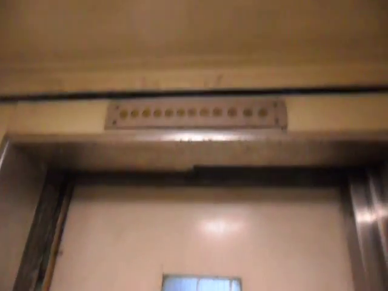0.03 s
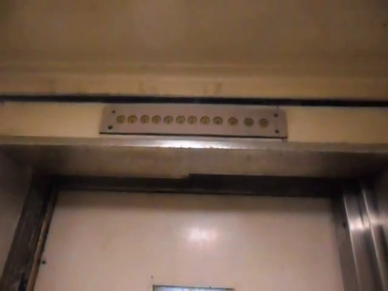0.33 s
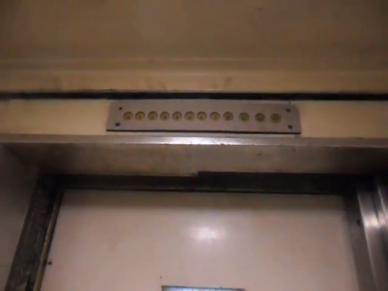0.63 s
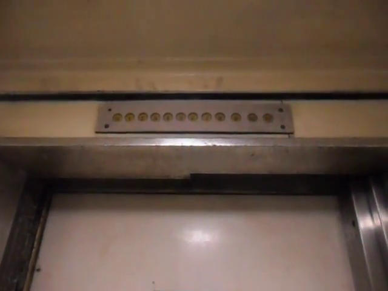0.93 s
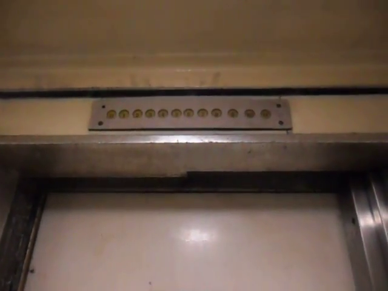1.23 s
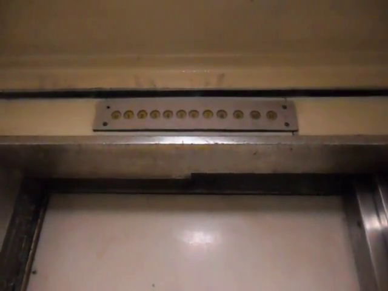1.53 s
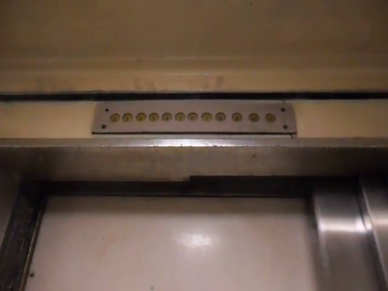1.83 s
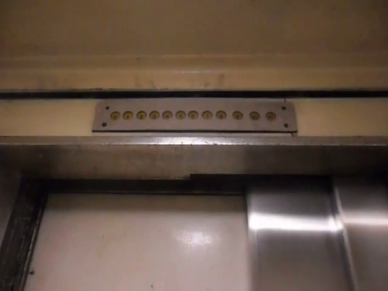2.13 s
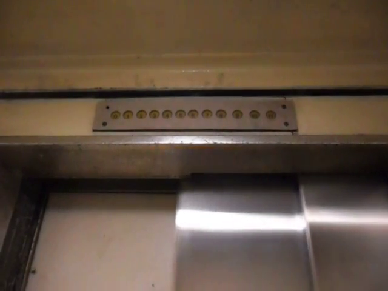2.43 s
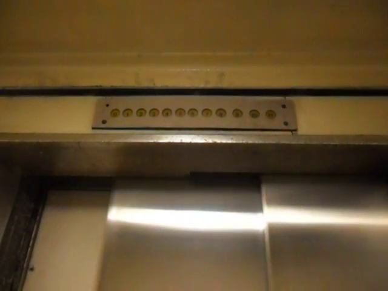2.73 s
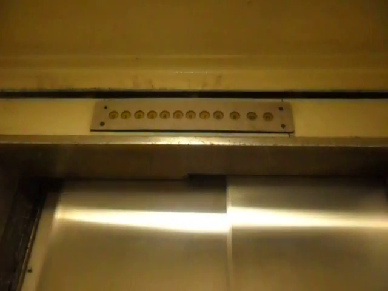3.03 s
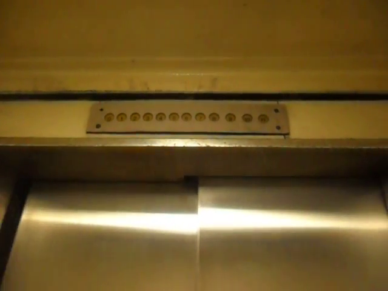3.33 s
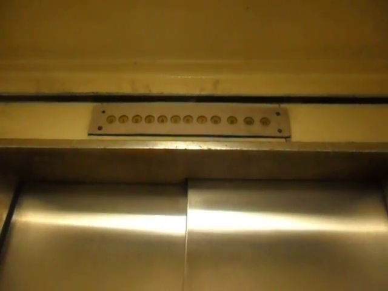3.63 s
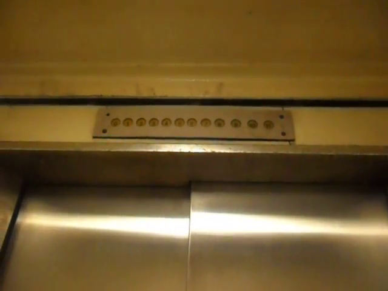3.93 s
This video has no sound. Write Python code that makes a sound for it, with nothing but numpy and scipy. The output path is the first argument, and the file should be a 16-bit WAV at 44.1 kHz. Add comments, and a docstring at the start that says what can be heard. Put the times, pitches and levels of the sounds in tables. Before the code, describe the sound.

Elevator doors roll shut with a grinding rattle and a clack over a steady fan hum.

```python
"""Inside an old lift car, small and hard-walled, a fan motor hums over a rush of air.
Two steel door panels roll shut: their rollers grind over grit, squeak and knock on joints in
the track. Loose hangers (the brackets that carry the doors) rattle, the steel sheets drone and
the car rumbles. The doors slow down and meet the frame, and the lock creaks and clacks home."""
import sys
import numpy as np
from scipy import signal
from scipy.fft import rfft, irfft
from scipy.io import wavfile

SR = 44100
rng = np.random.default_rng(int(sys.argv[2]) if len(sys.argv) > 2 else 0)


def transcribe(signal):
    """Save signal, clipped to [-1, 1], as a 16-bit WAV file at the path in sys.argv[1]."""
    frames = np.atleast_2d(signal).T
    limited = np.clip(frames, -1, 1)
    pcm = np.round(limited * 32767).astype(np.int16)
    wavfile.write(sys.argv[1], SR, pcm)


N = 176400
RING_CYCLES = 24  # struck steel fades by 60 dB in this many vibrations


def from_db(db):
    """Turn decibels into a number to multiply a sound by."""
    return 10 ** (np.asarray(db) / 20)


def rms_one(x):
    """Scale a signal so that its average strength (rms) is 1."""
    return x / np.sqrt(np.mean(x ** 2) + 1e-20)


def seconds():
    """The time of every sample."""
    return np.arange(N) / SR


def level(rows):
    """A volume curve through (time_s, level_db) points, silent before the first."""
    return from_db(np.interp(seconds(), *np.transpose(rows), left=-120))


def at_hz(points, hz):
    """Look up a (pitch_hz, value) table, with all octaves equally wide."""
    pitches, values = np.transpose(points)
    return np.interp(np.log(np.maximum(hz, 1)), np.log(pitches), values)


def drift(rate_hz):
    """A smooth random wobble of about size 1; a higher rate wobbles faster."""
    step, warm_up = 40, 2000
    r = np.exp(-2 * np.pi * rate_hz * step / SR)
    noise = rng.standard_normal(N // step + warm_up + 2)
    slow = signal.lfilter([1], [1, -2 * r, r * r], noise)[warm_up:]
    return np.interp(np.arange(N) / step, np.arange(len(slow)), rms_one(slow))


def colour(x, spectrum):
    """Make some pitches stronger and others weaker; white noise keeps its overall power."""
    size = 2 * N
    gain = rms_one(from_db(at_hz(spectrum, np.arange(N + 1) * SR / size)))
    cepstrum = irfft(np.log(gain))
    cepstrum[1:N] *= 2  # folded so that the filter rings after a hit, never before
    cepstrum[N + 1:] = 0
    return irfft(rfft(x, size) * np.exp(rfft(cepstrum)))[:N]


def ring(x, hz, fade_s):
    """Let a signal ring at one pitch, which dies away by 60 dB in fade_s."""
    r = np.exp(-np.log(1000) / (fade_s * SR))
    angle = 2 * np.pi * hz / SR
    return signal.lfilter([1, 0, -1], [1, -2 * r * np.cos(angle), r * r], x + 1e-18) * np.sqrt((1 - r) / 2)


def chatter(start_s, length_s):
    """A loose part bounces: a quick run of uneven taps that tend to get weaker."""
    taps_per_s, spread_db, loss_db = 500, 8, 7
    count = int(length_s * taps_per_s) + 1
    slip, size, sign = rng.random((count, 3)).T
    slip[0] = 0  # the first tap is on time
    progress = (np.arange(count) + slip) / count
    taps = from_db(spread_db * size - loss_db * progress) * np.sign(sign - .5)
    samples = ((start_s + length_s * progress) * SR).astype(int)
    out = np.zeros(N)
    out[np.minimum(samples, N - 1)] = rms_one(taps) * np.sqrt(length_s * SR / count)
    return out


def wavering_tone(hz, waver_hz, rough, pitch_rate_hz=164.6, volume_rate_hz=200):
    """A tone with wobbling pitch and volume; fast wobbles sound like metal sticking and slipping."""
    phase = 2 * np.pi * np.cumsum(hz + waver_hz * drift(pitch_rate_hz)) / SR
    return np.sin(phase) * (1 + rough * drift(volume_rate_hz))


def fan():
    """The fan motor hums almost steadily, with rushing air and a faint, thin whistle."""
    # tones of the motor: pitch_hz, level_db
    hum_tones = [(86.1, -40), (172.3, -55.5), (258.4, -56), (344.5, -53.5), (387.6, -56.5), (495.3, -64.5),
                 (538.3, -65)]
    # tone colour of the moving air: pitch_hz, relative_db
    air_colour = [(15, -15), (23, -6.5), (33, 3.5), (45, -11.5), (64, -11.5), (82, -2.5), (98, -1.5),
                  (112, -11.5), (140, -28.5), (175, -15.5), (215, -30.5), (280, -18.5), (400, -21),
                  (600, -25), (1000, -30), (2000, -35), (4000, -40), (10500, -45.5)]
    air = from_db(-38.5) * colour(rng.standard_normal(N), air_colour)
    whistle = from_db(-69) * ring(rng.standard_normal(N), hz=7100, fade_s=0.031)
    out = air + whistle
    for hz, db in hum_tones:
        tone = wavering_tone(hz, waver_hz=1.14, rough=0.32, pitch_rate_hz=4.55, volume_rate_hz=4)
        out += from_db(db) * np.sqrt(2) * tone
    return out


def rattles():
    """A faint rattle sounds first at 1.49 s; then the loose hangers chatter in bursts, some bright and some
    dull."""
    # bursts of rattling: start_s, level_db, length_s, treble_db
    bursts = [(1.489, -57.5, 0.14, 8), (1.723, -33.5, .03, -3.5), (1.751, -31, .04, -11),
              (1.841, -29.5, 0.039, -20), (1.946, -31.5, 0.027, 2), (1.979, -26.5, 0.033, 0.5),
              (2.093, -27.5, .04, -16), (2.171, -30, .03, 0), (2.213, -31, 0.073, -9),
              (2.338, -36.5, 0.033, 10), (2.412, -31.5, 0.038, -26), (2.471, -27.5, 0.047, -3),
              (2.536, -27.5, 0.017, -4), (2.564, -34.5, .06, 4), (2.664, -41, 0.04, 14),
              (2.73, -27.5, 0.053, 2.5), (2.787, -32.5, .06, 2), (2.879, -42, 0.028, 16.5),
              (2.966, -30.5, .04, -3), (3.043, -39, 0.026, 13.5), (3.107, -45.5, 0.016, 14),
              (3.212, -38.5, 0.032, 2), (3.278, -43, .025, 8), (3.324, -41, .008, -3),
              (3.365, -42.5, 0.046, 0)]
    treble_hz = 4670
    high = signal.butter(2, treble_hz, "high", fs=SR, output="sos")
    low = signal.butter(2, treble_hz, fs=SR, output="sos")
    out = np.zeros(N)
    for start_s, db, length_s, treble_db in bursts:
        taps = from_db(db - 0.25) * chatter(start_s, length_s) + 1e-18
        out += signal.sosfilt(low, taps) - from_db(treble_db) * signal.sosfilt(high, taps)
    return steel(out)


def steel(taps):
    """Make bare taps sound like steel hitting steel."""
    # tone colour of the steel: pitch_hz, relative_db
    steel_colour = [(150, -24), (300, 4.5), (700, 3), (1100, 5.5), (2000, 0.5), (3300, -1), (4300, -11.5),
                    (5600, -14.5), (7500, -15), (10500, -21)]
    return colour(taps, steel_colour)


def rumble():
    """The car shakes under the moving doors with a deep noise."""
    # strength of the shaking: time_s, level_db
    shaking = [(1.5, -61), (1.68, -40.5), (1.95, -34), (2.0, -22.5), (2.18, -31.5), (2.28, -24.5),
               (2.35, -39), (2.43, -25), (2.64, -28.5), (2.83, -23), (2.89, -33), (3.22, -30), (3.33, -34),
               (3.44, -35.5), (3.5, -32.5), (3.6, -34.5), (4.0, -39.5)]
    # tone colour of the car: pitch_hz, relative_db
    car_colour = [(15, -14), (26, -3.5), (36, 3), (47, -10), (58, -5.5), (72, -1), (92, 3.5), (115, -13.5),
                  (160, -17), (220, -26), (500, -54.5)]
    return level(shaking) * colour(rng.standard_normal(N), car_colour)


def rollers():
    """Grit and pits in the track send tiny ticks through the wheels into one door."""
    # strength of the rolling as the doors speed up and slow down: time_s, level_db
    rolling = [(1.6, -58), (1.68, -38), (1.76, -34), (1.88, -27), (1.95, -35.5), (2.06, -25), (2.15, -32),
               (2.26, -25.5), (2.53, -27), (2.68, -29.5), (2.8, -22.5), (2.92, -30), (3.05, -26.5),
               (3.24, -35), (3.46, -41), (3.54, -36.5), (3.69, -33.5), (3.82, -42), (4.0, -53.5)]
    ticks_per_s, spread_db, uneven_db = 900, 3, 1.5
    sizes = from_db(spread_db * np.minimum(rng.exponential(1, N), 4)) * rng.choice([-1, 1], N)
    ticks = rms_one(sizes * (rng.random(N) < ticks_per_s / SR))
    unevenness = from_db(1 + uneven_db * drift(35))
    return ticks * level(rolling) * unevenness / np.sqrt(2)  # each door has half the power


def door(force):
    """A door panel turns the ticks and thuds it is given into a low grinding."""
    # tone colour of a rolling door: pitch_hz, relative_db
    door_colour = [(100, -32), (160, -8), (220, -25.5), (280, -0.5), (340, -8), (420, -4), (560, -6.5),
                   (1000, -9), (1300, -15), (2200, -21), (3200, -23.5), (4100, -33), (6000, -34.5),
                   (10500, -44.5)]
    return colour(force, door_colour)


def sheets(force):
    """The doors' steel sheets ring when shaken; each note swells and bends as they flex."""
    # natural notes of the sheets: pitch_hz, relative_db, fade_s
    notes = [(264, -3.5, 0.34), (292.1, -7, 0.48), (343, -20, 0.15), (401, -2, 0.9), (440, -2, 0.61),
             (498, -1, 1), (624.5, -4.5, 0.26), (686, -8, 0.61), (831.7, -6, 0.1), (965, -9, 0.085),
             (1087, -10, 0.32), (1310, -15, 0.26), (1614, -8.5, 0.16), (1878, -12, 0.36), (2606, -30, 0.35)]
    swell_db, bend_cycles = 2.5, 0.29
    out, t = np.zeros(N), seconds()
    for hz, db, fade_s in notes:
        note = ring(force * from_db(db + swell_db * drift(10)), hz, fade_s)
        bent_time = t + bend_cycles * drift(3.32) / hz
        out += np.interp(bent_time, t, note)
    return from_db(-2.5) * out / 2


def judders():
    """A juddering roller drives a steel sheet into a brief, rough drone."""
    # swells of the drone: peak_s, level_db, pitch_hz, rise_s, fall_s
    drones = [(1.635, -36.5, 391.5, 0.017, 0.015), (1.895, -25, 300, 0.012, 0.016),
              (2.07, -22, 296.7, .02, 0.016), (2.151, -24, 445, 0.0083, 0.051),
              (2.245, -22, 436.6, 0.03, .02), (2.288, -13.5, 441.2, 0.014, 0.015),
              (2.346, -16.5, 455, 0.013, 0.013), (2.385, -19.5, 297.8, 0.015, 0.027),
              (2.53, -19, 283.4, 0.03, 0.015), (2.801, -19.5, 393.8, 0.047, 0.031),
              (2.935, -25.5, 287.6, 0.012, .02), (3.069, -9.5, 465, 0.011, 0.0048),
              (3.112, -13.5, 478.6, 0.011, 0.038), (3.18, -32, 297, 0.042, 0.022),
              (3.244, -28, 296.5, 0.082, 0.11)]
    out = np.zeros(N)
    for peak_s, db, hz, rise_s, fall_s in drones:
        t = seconds() - peak_s
        swell = np.exp(np.minimum(t / rise_s, -t / fall_s))
        tone = wavering_tone(hz, waver_hz=21, rough=0.35, pitch_rate_hz=59.7, volume_rate_hz=92)
        out += from_db(db) * swell * tone
    return out


def clacks():
    """Each catch bounces, rings and thuds into the doors. Gives back the clack and the thud."""
    # the drive engages, then the doors meet the frame and lock:
    # start_s, level_db, pitch_hz, ring_db, thud_db
    catches = [(1.673, -45, 1000, 2, -10), (3.485, -37.5, 4500, 0.5, 7), (3.555, -35, 1054, 9, -7),
               (3.626, -28.5, 3300, -3, 3.5), (3.65, -34.5, 640, -2, -12), (3.687, -32, 4170, -3.5, -2.5),
               (3.784, -53, 1780, 9, 13), (3.833, -49, 4340, 8.5, -5)]
    # tone colour of the lock: pitch_hz, relative_db
    lock_colour = [(150, -21), (350, 10), (700, 0), (1600, 9), (2300, -1.5), (3600, 3.5), (4500, -12.5),
                   (7000, -19), (10500, -46)]
    clack, thud = np.zeros((2, N))
    for start_s, db, hz, ring_db, thud_db in catches:
        taps = from_db(db - 2.5) * chatter(start_s, length_s=0.014)
        clack += colour(taps, lock_colour) + from_db(ring_db) * ring(taps, hz, RING_CYCLES / hz)
        thud += from_db(thud_db) * taps
    return clack, thud


def squeaks():
    """Dry roller bearings stick and slip in short, rough chirps."""
    # chirps of the bearings: start_s, length_s, pitch_hz, level_db
    chirps = [(1.762, 0.069, 3230, -40), (1.835, 0.031, 3170, -32), (1.898, 0.038, 2915, -30.5),
              (1.951, 0.038, 2700, -30), (2.087, 0.034, 3410, -33.5), (2.2, 0.036, 3050, -30),
              (2.403, 0.028, 3176, -34), (2.435, 0.032, 2870, -34), (2.537, 0.026, 2914, -29),
              (2.607, 0.015, 2990, -32), (2.666, 0.029, 3340, -38), (2.952, 0.068, 3000, -33)]
    out = np.zeros(N)
    for start_s, length_s, hz, db in chirps:
        swell = np.sin(np.pi * np.clip((seconds() - start_s) / length_s, 0, 1))
        out += from_db(db) * swell * wavering_tone(hz, waver_hz=84.9, rough=0.6)
    return out


def knocks():
    """Rollers drop over joints in the track; each hard knock rings at its own pitch."""
    # knocks at the joints: start_s, level_db, pitch_hz, ring_db
    joints = [(1.845, -30, 3270, -5), (1.98, -28.5, 4760, -1), (2.212, -28, 1290, -5),
              (2.245, -29.5, 1060, -4), (2.342, -32, 2930, -4), (2.469, -25.5, 1810, -3),
              (2.731, -21, 1600, -7), (2.886, -28, 5200, -6), (2.981, -21.5, 1770, -9),
              (3.237, -38, 1270, -1), (3.283, -33.5, 3500, -8)]
    blows, rings = np.zeros((2, N))
    for start_s, db, hz, ring_db in joints:
        taps = from_db(db + 0.5) * chatter(start_s, length_s=0.007)
        blows += taps
        rings += from_db(ring_db) * ring(taps, hz, RING_CYCLES / hz)
    return steel(blows) + rings


def creak():
    """The latch scrapes home under growing pressure; its pitch climbs, then sags a little."""
    # path of the creak: time_s, pitch_hz, level_db
    scrape = [(3.555, 1030, -67), (3.566, 1190, -37), (3.59, 1546, -37), (3.613, 1658, -38),
              (3.635, 1720, -45), (3.70, 1663, -39), (3.758, 1615, -54)]
    times, hz, db = np.transpose(scrape)
    volume = from_db(np.interp(seconds(), times, db, left=-120, right=-120))
    pitch = np.interp(seconds(), times, hz)
    return volume * wavering_tone(pitch, waver_hz=109.4, rough=1)


def cabin(x, echo_db):
    """Add the echo of the hard walls, its power echo_db minus 3 dB relative to the direct sound; low notes last
    longest."""
    # time the echo takes to fall by 60 dB: pitch_hz, fade_s
    fade_times = [(200, 0.53), (1000, 0.14), (4000, 0.29), (10000, 0.2)]
    first_echo_s = 0.0035
    t, edges_hz = np.arange(SR // 2) / SR, np.geomspace(100, 12800, 8)
    tail = np.zeros(len(t))
    for low, high in zip(edges_hz, edges_hz[1:]):
        octave = signal.butter(2, [low, high], "band", fs=SR, output="sos")
        fade = np.exp(-np.log(1000) * t / at_hz(fade_times, np.sqrt(low * high)))
        tail += signal.sosfilt(octave, rng.standard_normal(len(t))) * fade
    tail *= t > first_echo_s
    response = from_db(echo_db) * tail / np.sqrt(2 * np.sum(tail ** 2))
    response[0] = 1  # the direct sound
    return signal.fftconvolve(x, response)[:N] / np.sqrt(1 + from_db(echo_db) ** 2)


def scene():
    """Mix doors, hangers and lock, each with its own echo, with the sheets, rumble and fan."""
    hangers = cabin(rattles(), echo_db=5)
    first_ticks, second_ticks = rollers(), rollers()
    drone = judders()
    clack, thud = clacks()
    doors = cabin(door(first_ticks + thud), echo_db=1) + cabin(door(second_ticks), echo_db=1)
    ringing = sheets(first_ticks + second_ticks + thud + from_db(-15) * drone)
    small_parts = cabin(clack + squeaks() + creak(), echo_db=0)
    joints = cabin(knocks(), echo_db=1)
    return (fan() + hangers + rumble() + doors + ringing + drone + small_parts + joints)[None]


def record(dry):
    """Cut away the highest treble steeply."""
    cutoff_hz = 10700
    return signal.sosfilt(signal.ellip(10, .2, 80, cutoff_hz, fs=SR, output="sos"), dry)


dry = scene()
out = record(dry)
transcribe(out)
```